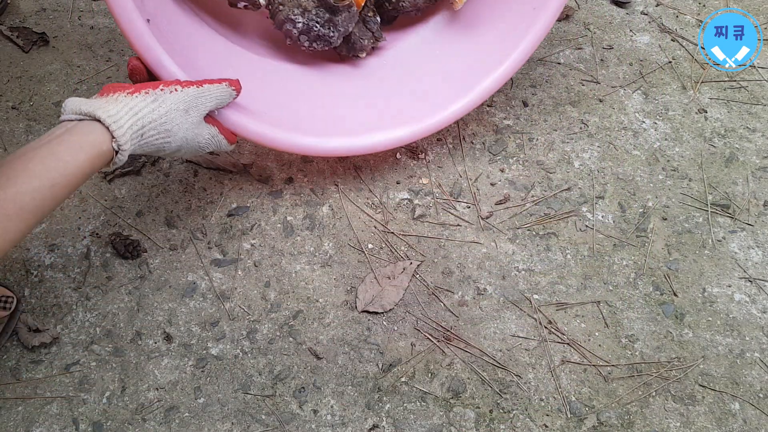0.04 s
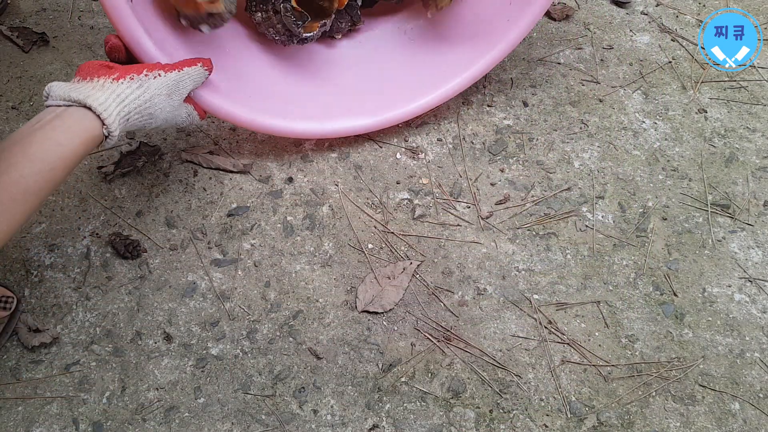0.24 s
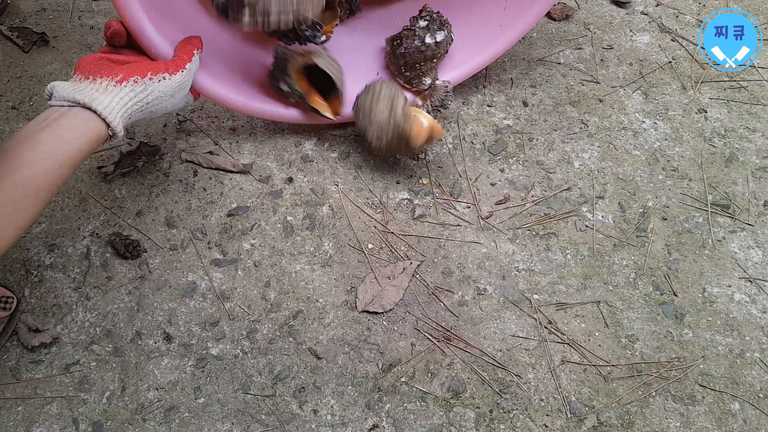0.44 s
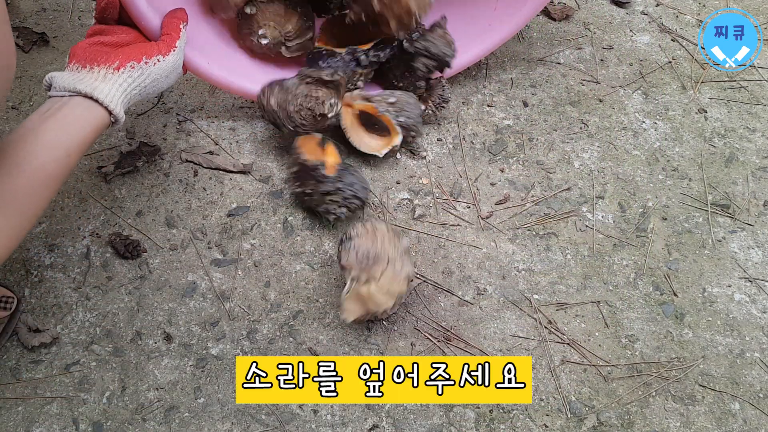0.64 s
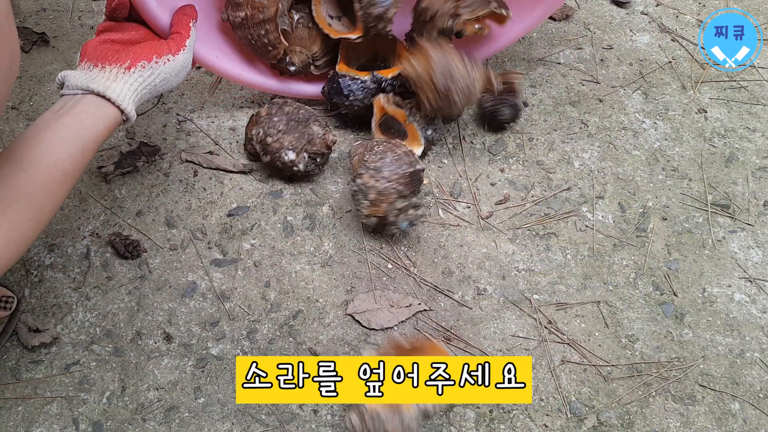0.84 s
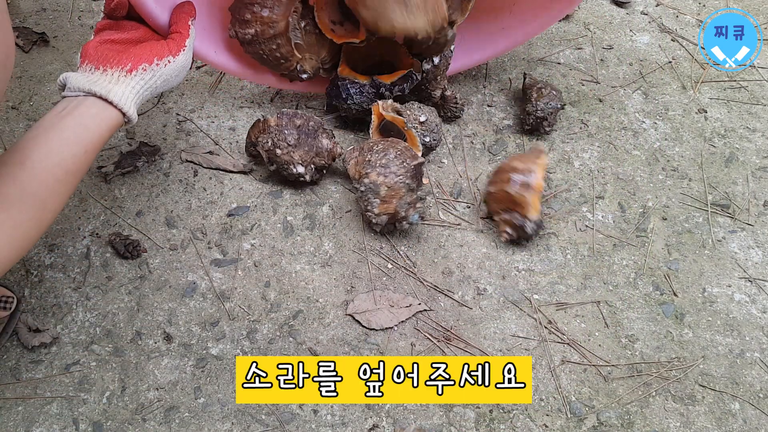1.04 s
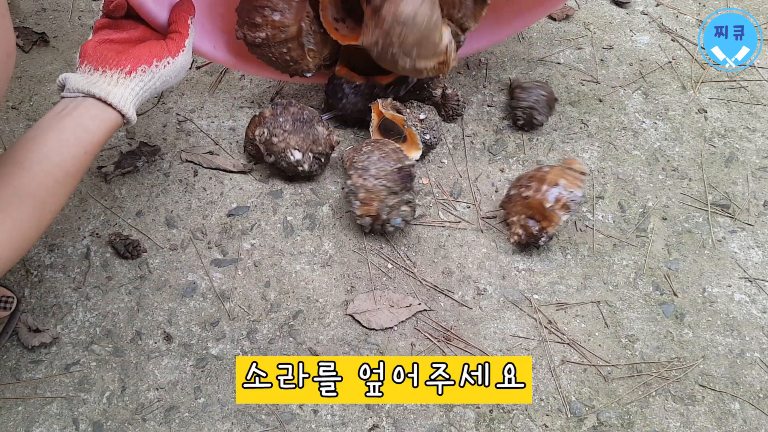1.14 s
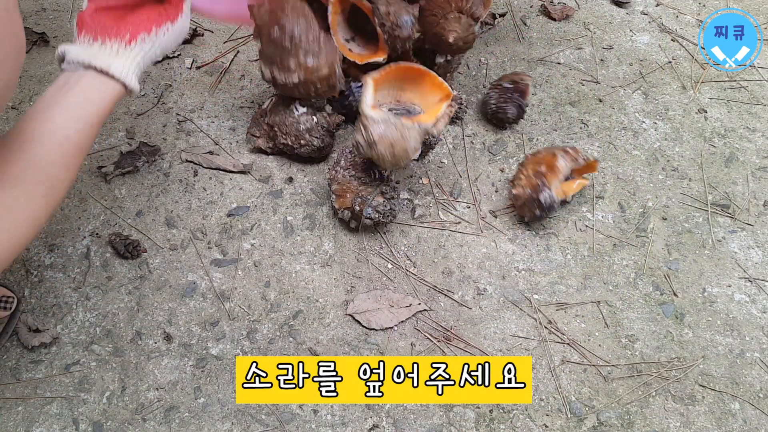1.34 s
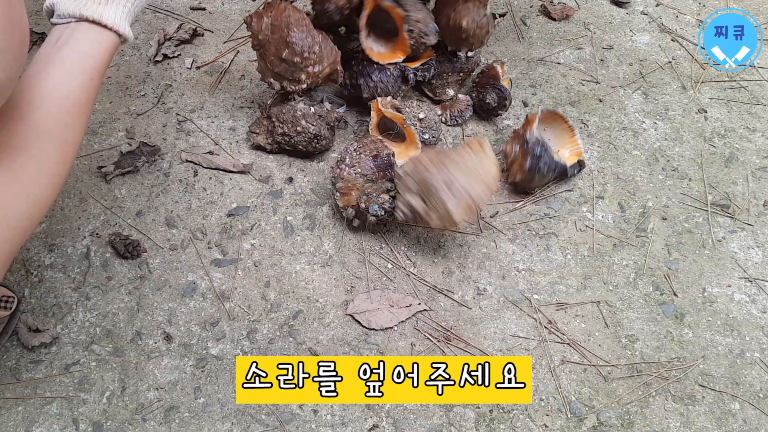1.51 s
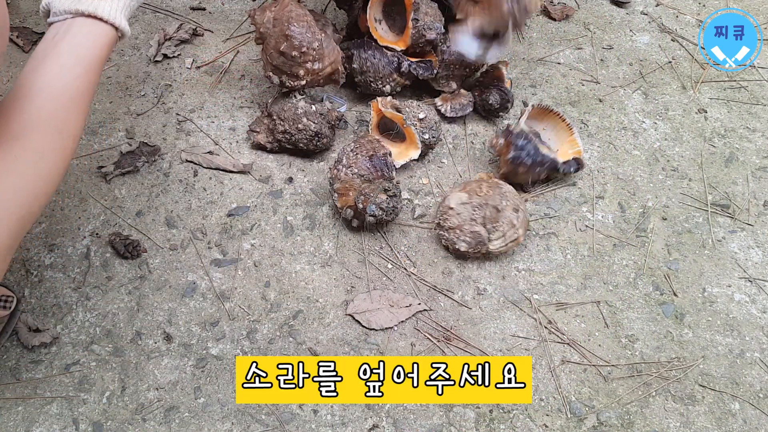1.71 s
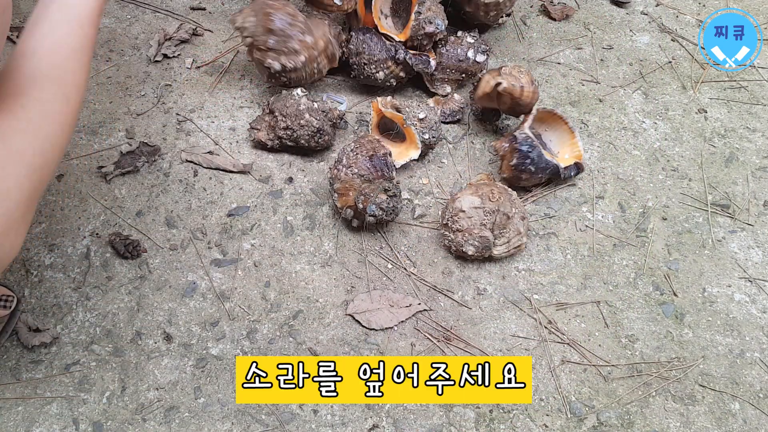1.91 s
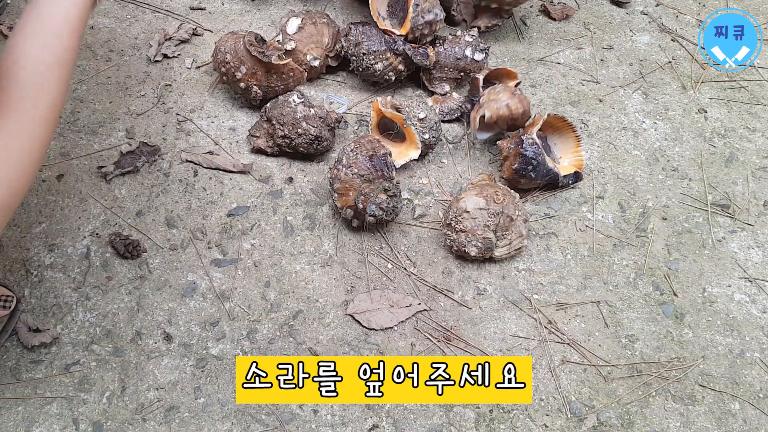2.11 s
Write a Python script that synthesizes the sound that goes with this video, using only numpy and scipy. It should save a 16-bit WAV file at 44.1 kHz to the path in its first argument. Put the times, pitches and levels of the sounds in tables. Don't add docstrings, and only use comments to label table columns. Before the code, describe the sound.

Heavy sea snail shells tumble from a plastic basin onto concrete, clattering densely, then thinning out

```python
import sys
import numpy as np
from scipy import signal
from scipy.fft import irfft
from scipy.io import wavfile
from scipy.ndimage import uniform_filter1d

SR = 44100
rng = np.random.default_rng(int(sys.argv[2]) if len(sys.argv) > 2 else 0)


def store_pcm(level_fs):
    pcm = np.round(np.clip(level_fs, -1, 1) * 32767).astype(np.int16)
    wavfile.write(sys.argv[1], SR, np.atleast_2d(pcm).T)


def linear_from_db(decibels):
    return 10 ** (np.asarray(decibels, float) / 20)


N = 95388

# (time [s], peak level [dB], main mode [Hz])
FIRST_KNOCKS = [(.109, -8, 1400), (.179, -13, 972), (.198, -5, 894), (.211, -5, 907), (.256, -14, 990),
                (.28, -6, 2070), (.358, -5, 810), (.399, -1, 1300), (.411, -3, 888), (.446, -2, 1300),
                (.456, 0, 1600), (.469, -1, 950), (.552, -5, 1400), (.584, -5, 1690), (.603, -7, 900),
                (.649, -5, 993), (.686, -3, 1007), (.722, -10, 1500), (.735, -11, 1580), (.751, -7, 996),
                (.865, -3, 800), (.898, -16, 837)]
LATER_KNOCKS = [(1.006, -8, 1100), (1.028, -11, 880), (1.046, -12, 1580), (1.112, -6, 1753),
                (1.165, -11, 1260), (1.218, -10, 1330), (1.309, -17, 2200), (1.326, -12, 1670),
                (1.341, -10, 730), (1.361, -6, 975), (1.425, -12, 800), (1.433, -7, 988), (1.48, -5, 1383),
                (1.511, -8, 1626), (1.532, -12, 1383), (1.586, -14, 1433), (1.616, -9, 1382),
                (1.683, -11, 1790), (1.858, -19, 900), (1.927, -18, 900), (1.946, -17, 1026),
                (1.972, -19, 1780), (2.003, -13, 1540), (2.032, -13, 993), (2.097, -18, 1310),
                (2.123, -20, 1025)]
# (time [s], peak level [dB], main mode [Hz])
SMALL_KNOCKS = [(.092, -16, 600), (.118, -11, 2000), (.325, -17, 1030), (.497, -12, 900), (.512, -10, 780),
                (.541, -14, 900), (.655, -8, 2000), (.811, -18, 1020), (.971, -21, 590), (1.229, -13, 1300),
                (1.267, -18, 783), (1.411, -12, 1690), (1.468, -14, 1400), (1.494, -11, 950),
                (1.682, -15, 980), (2.074, -24, 540)]
# (time [s], peak level [dB], main mode [Hz])
FIRST_CLINKS = [(.1136, -14, 4690), (.2109, -11, 3410), (.2798, -13, 4120), (.4424, -14, 4000),
                (.5087, -14, 4140), (.5836, -8, 2880), (.5974, -14, 3880), (.6484, -12, 3760),
                (.6759, -11, 4000), (.6898, -9, 2906), (.7387, -11, 4900), (.7811, -9, 3250),
                (.8649, -13, 2200)]
LATER_CLINKS = [(.9946, -13, 3797), (1.0221, -19, 4930), (1.1164, -14, 3670), (1.1643, -15, 3367),
                (1.2176, -18, 4310), (1.3892, -15, 3560), (1.4127, -12, 4470), (1.4506, -12, 4460),
                (1.4945, -15, 3390), (1.5439, -15, 4590), (1.936, -25.5, 3060), (2.0023, -15, 3706),
                (2.0318, -18, 3800), (2.0562, -18, 3510)]
SMALL_CLINKS = [(.1242, -17, 5900), (.3901, -17, 3950), (.4509, -17, 3090), (.5517, -19, 4220),
                (.625, -16, 3750), (.7218, -16, 3530), (.9946, -17, 2950), (1.093, -27, 4580),
                (1.285, -25, 3700), (1.3254, -17, 3850), (1.453, -14, 3200), (1.517, -18, 3750),
                (1.554, -19, 2900), (1.5669, -17, 3770), (1.7589, -33, 3530), (2.1306, -27, 2820)]
# (time [s], peak level [dB], main mode [Hz])
WALL_THUMPS = [(.098, -16, 244), (.207, -14, 260), (.259, -15, 270), (.357, -11, 270), (.409, -13, 291),
               (.447, -11, 230), (.682, -14, 218), (.863, -18, 278), (1.01, -23, 312), (1.422, -20, 280),
               (1.635, -11, 226), (2.005, -27, 229)]
# (time [s], peak level [dB], main mode [Hz])
SNAPS = [(.116, -9, 1000), (.127, -10, 900), (.197, -6, 1200), (.2165, -7, 600), (.358, -11, 700),
         (.398, -7, 1100), (.4125, -5, 800), (.584, -5, 2500), (.865, -9, 900), (1.4255, -5, 800),
         (1.434, -4, 1000), (1.617, -4, 1200), (2.032, -19, 1500)]
# (time [s], peak level [dB])
GRIT = [(0.0887, -20.5), (0.1244, -23), (0.178, -15.5), (0.2099, -15), (0.2788, -14), (0.398, -15.5),
        (0.4409, -22), (0.5077, -15.5), (0.5511, -15.5), (0.5965, -17), (0.6464, -15.5),
        (0.6739, -12.5), (0.7811, -13), (0.8649, -17), (0.9941, -16.5), (1.1094, -28),
        (1.1633, -25.5), (1.2266, -24.5), (1.3079, -28), (1.3887, -17), (1.4122, -18),
        (1.4506, -21.5), (1.483, -18.5), (1.5918, -16.5), (1.7913, -26), (1.9355, -23),
        (2.0562, -26), (2.1226, -31)]
MORE_GRIT = [(.2374, -19), (.3571, -24), (.4105, -18), (.4684, -20), (.5836, -21), (.69, -20), (.74, -22),
             (.9712, -26), (1.05, -27), (1.3429, -26), (1.5125, -22), (1.5429, -26), (1.6597, -28),
             (1.9725, -31), (2.0029, -27), (2.0318, -26)]
# (time [s], peak level [dB])
BOOMS = [(.12, -32), (.2, -28), (.35, -31), (.43, -26), (.57, -28), (.73, -19), (.87, -30), (1.12, -28),
         (1.34, -19), (1.52, -23), (1.66, -27), (1.89, -27), (2.03, -28)]
# (time [s], heap rattle level [dB], level of shells still in the basin [dB])
POUR = [(.05, -56, -46), (.11, -27, -27), (.3, -29, -26), (.45, -23, -26), (.62, -25, -31), (.76, -27, -29),
        (.83, -37, -38), (.95, -38, -44), (1.03, -32, -39), (1.075, -38, -42), (1.2, -29, -38),
        (1.26, -33, -39), (1.36, -26, -35), (1.66, -29, -31), (1.73, -41, -41), (1.78, -45, -44),
        (1.95, -37, -42), (2.15, -39, -44)]
# (frequency [Hz], level [dB], decay time t60 [s])
LONE_MODES = [(1857, -2, .035), (2200, 0, .03), (2650, -6, .03), (2980, -8, .03), (3919, 0, .05),
              (4269, -7, .03), (5044, -10, .03), (10660, -27, .04)]
# (time [s], peak level [dB])
BOUNCES = [
    (1.7908, -4),
    (1.7922, -1),
    (1.7955, -3),
    (1.807, -12),
    (1.82, -15),
    (1.862, -13),
    (1.868, -15),
]
# (lowest mode [ratio to main], highest mode [ratio to main],
# other modes [dB], tilt [dB per octave], decay time t60 [s], chatter [s], rise [s])
KNOCK_BODY = [.72, 4.2, -7, -6, .027, .016, .0004]
CLINK_BODY = [.7, 1.6, -11, -3, .033, .008, .0004]
THUMP_BODY = [.75, 2.5, -5, -3, .08, .012, .003]
SNAP_BODY = [.6, 3, -4, -3, .005, .002, .0002]
# (frequency [Hz], density [dB per Hz])
HEAP_SPECTRUM = [(300, -30), (800, -1), (1700, -3), (2600, -13), (3900, -7), (6300, -19), (14000, -17),
                 (16000, -20)]
SLIDE_SPECTRUM = [(45, -35), (130, -14), (220, 0), (650, -8), (1200, -40)]
YARD_SPECTRUM = [(30, 0), (320, -4.5), (2500, -28), (5000, -17), (16000, -33)]

APART_HZ = 3200
OPPOSITE = np.array([[1], [-1]])


def evened(x):
    return x / np.sqrt(np.mean(x ** 2) + 1e-20)


def curve(table, index):
    rows = np.array(table)
    return np.interp(np.arange(N) / SR, rows[:, 0], rows[:, index])


def colour(x, spectrum):
    hz = np.fft.rfftfreq(1024, 1 / SR)
    f, db = np.transpose(spectrum)
    gain = linear_from_db(np.interp(np.log(hz + 1), np.log(f + 1), db))
    response = np.roll(irfft(gain), 512) * np.hanning(1024)
    return signal.oaconvolve(x, response[None], "same", axes=1)


def add(mix, s, sound):
    part = mix[:, round(s * SR):][:, :sound.shape[1]]
    part += sound[:, :part.shape[1]]


def yard():
    air = rng.standard_normal((3, N))
    return linear_from_db(-50) * evened(colour(air[:2] * .6 + air[2], YARD_SPECTRUM))


def grains(per_s, lo_hz, hi_hz, cycles, spread_db, tick_db):
    out, t = np.zeros((2, N)), np.arange(2500) / SR
    size = linear_from_db(spread_db * np.minimum(rng.exponential(1, N), 5)) * (rng.random(N) < per_s / SR)
    kind = rng.integers(0, 48, N)
    for k, (a, b, c) in enumerate(rng.random((48, 3))):
        f = lo_hz * (hi_hz / lo_hz) ** ((k + a) / 48)
        turn = np.clip(f / APART_HZ, 0, 1) * 3.68 * (b - .5) * OPPOSITE
        decay = linear_from_db(-60 * t * f / (cycles * (.5 + c)))
        tap = decay * np.sin(2 * np.pi * f * t + turn) * f / hi_hz
        tick = linear_from_db(tick_db - 60 * t / .0065) * rng.standard_normal((2, len(t)))
        out += signal.oaconvolve((size * (kind == k))[None], tap + tick, axes=1)[:, :N]
    return out


def rattle():
    heap = colour(grains(1600, 450, 6020, 20, 3.6, -11), HEAP_SPECTRUM)
    slide = colour(grains(500, 78.4, 606, 14, 2.1, -40), SLIDE_SPECTRUM)
    return linear_from_db(curve(POUR, index=1)) * evened(heap) + linear_from_db(curve(POUR, index=2)) * evened(slide)


def walls(x):
    t = np.arange(9000) / SR
    sparse = rng.standard_normal((2, len(t))) * (rng.random((2, len(t))) < .05)
    tail = sparse * linear_from_db(-60 * t / .14) * (t > .002)
    without_rumble = signal.lfilter([1, -1], [1, -.93], x)
    return signal.oaconvolve(without_rumble, tail / np.linalg.norm(tail[0]), axes=1)[:, :N]


def cracks(table):
    t, out = np.arange(2500) / SR, np.zeros((2, N))
    decay = linear_from_db(-60 * t / .04) + linear_from_db(-8 - 60 * t / .08)
    envelope = np.minimum(t / .0015, 1) * decay
    for (s, db), noise in zip(table, rng.standard_normal((40, 3, len(t)))):
        rough = linear_from_db(3 * evened(uniform_filter1d(noise[2], 40)))
        add(out, s, linear_from_db(db - 9.5) * noise[:2] * rough * envelope)
    bright = colour(out, [(2500, -17), (5000, 4), (8000, 2.5), (13000, 4.5), (16000, 0)])
    return linear_from_db(-1.2 * OPPOSITE) * bright


def ring(hz, lo, hi, others_db, tilt_db, t60, luck):
    t, out = np.arange(3000) / SR, np.zeros((2, 3000))
    for k, (a, b, c) in enumerate(luck):
        ratio, db, swing = 1, 0, 1.4
        if k:
            ratio = lo * (hi / lo) ** ((k - a) / len(luck))
            db = others_db + 8 * (c - .5) + tilt_db * np.log2(max(ratio, 1))
            swing = 2.8
        turn = min(hz * ratio / APART_HZ, 1) * swing * (b - .5) * OPPOSITE
        decay = linear_from_db(db - 60 * t * np.sqrt(ratio) / t60)
        out = out + decay * np.sin(2 * np.pi * hz * ratio * t + turn)
    return out


def chatter(length, luck):
    train = np.zeros(2000)
    when, size = luck.T
    at = np.clip(when * length * SR, 1, 1999).astype(int)
    np.add.at(train, at, np.sign(size - .5) * linear_from_db(-5 - 8 * when - 9 * (2 * size % 1)))
    train[0] = 1
    return train[None]


def hits(table, body):
    out = np.zeros((2, N))
    lo, hi, others_db, tilt_db, t60, length, rise_s = body
    mode_luck, contact_luck = rng.random((40, 12, 3)), rng.random((40, 12, 2))
    for (s, db, hz), a, b in zip(table, mode_luck, contact_luck):
        x = signal.oaconvolve(chatter(length, b), ring(hz, lo, hi, others_db, tilt_db, t60, a), axes=1)
        rise = np.minimum(np.arange(x.shape[1]) / SR / rise_s, 1)
        add(out, s, linear_from_db(db + 3.2) * x * rise / abs(x).max())
    return out


def boom():
    t, out = np.arange(0, .6, 1 / SR), np.zeros((2, N))
    held_hz, resting_hz, set_down_s, t60 = 85, 60, .5, .6
    swell = np.sin(np.pi / 2 * np.minimum(t / .035, 1)) ** 2
    for s, db in BOOMS:
        hz = held_hz if s < set_down_s else resting_hz
        add(out, s, (linear_from_db(db - 60 * t / t60) * swell * np.sin(2 * np.pi * hz * t))[None])
    return out


def lone_shell():
    t, out = np.arange(4000) / SR, np.zeros((2, N))
    for (s, db), luck in zip(BOUNCES, rng.random((10, 10, 2))):
        x = np.zeros((2, len(t)))
        for (hz, mode_db, t60), (a, b) in zip(LONE_MODES, luck):
            decay = linear_from_db(mode_db + 5 * (a - .5) - 60 * t / t60)
            x += decay * np.sin(2 * np.pi * hz * t + 1.5 * (b - .5) * OPPOSITE)
        add(out, s, linear_from_db(db) * x / abs(x).max())
    return out


def scene():
    near = hits(FIRST_KNOCKS, KNOCK_BODY) + hits(LATER_KNOCKS, KNOCK_BODY)
    near = near + hits(WALL_THUMPS, THUMP_BODY)
    near = near + hits(FIRST_CLINKS, CLINK_BODY) + hits(LATER_CLINKS, CLINK_BODY)
    near = near + cracks(GRIT) + rattle()
    no_thud = signal.butter(2, 350, "high", fs=SR, output="sos")
    near = near + signal.sosfilt(no_thud, hits(SNAPS, SNAP_BODY))
    near = near + hits(SMALL_KNOCKS, KNOCK_BODY) + hits(SMALL_CLINKS, CLINK_BODY)
    near = near + cracks(MORE_GRIT) + lone_shell()
    quiet = yard()
    return near + linear_from_db(-7) * walls(near) + boom() + quiet


def low_pass(x):
    return signal.sosfilt(signal.butter(12, 16970, fs=SR, output="sos"), x)


def record(dry):
    hot = signal.sosfilt(signal.butter(2, 38, "high", fs=SR, output="sos"), dry)
    left_db, ceiling = 1.3, 1.3
    hot = ceiling * np.tanh(hot * linear_from_db(left_db * OPPOSITE) / ceiling)
    edge = signal.firwin(255, 15950, fs=SR)
    return low_pass(signal.oaconvolve(hot, edge[None], "same", axes=1))


dry = scene()
out = record(dry)
store_pcm(out)
```